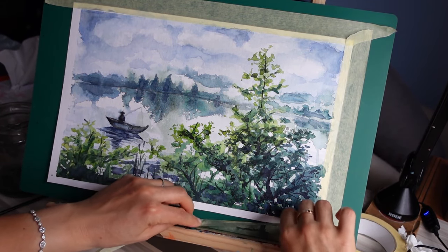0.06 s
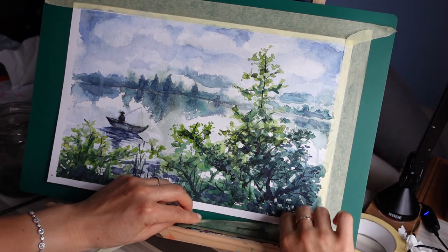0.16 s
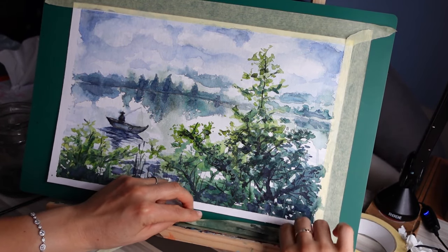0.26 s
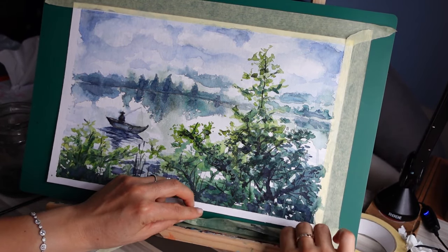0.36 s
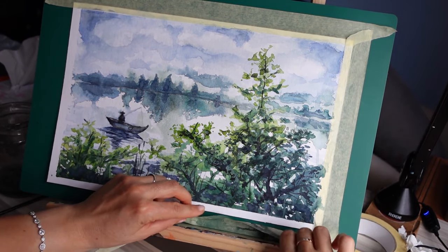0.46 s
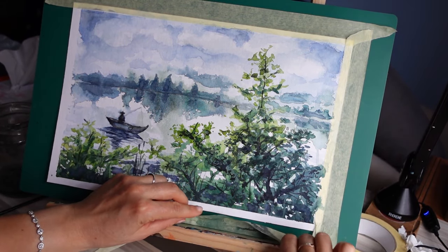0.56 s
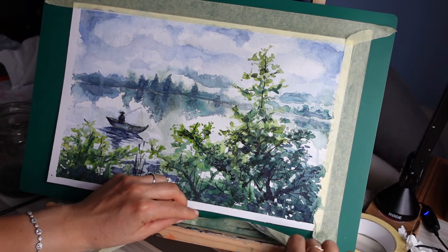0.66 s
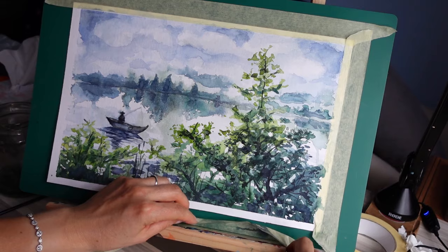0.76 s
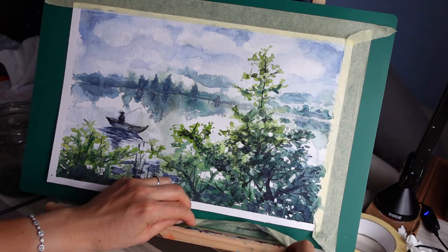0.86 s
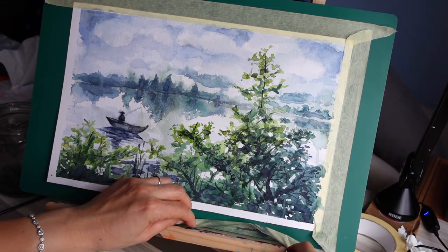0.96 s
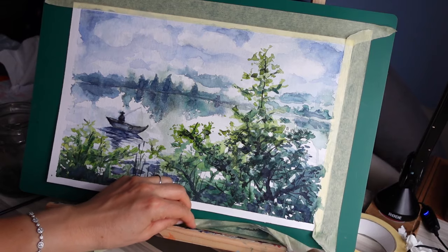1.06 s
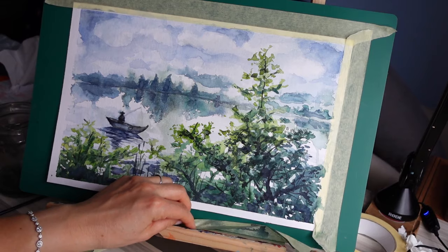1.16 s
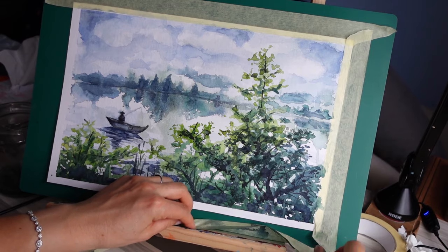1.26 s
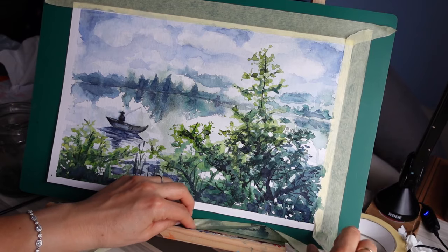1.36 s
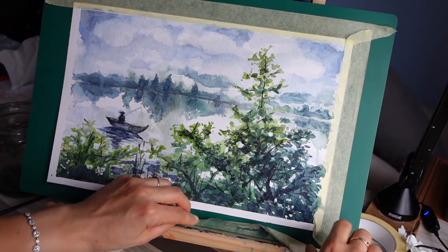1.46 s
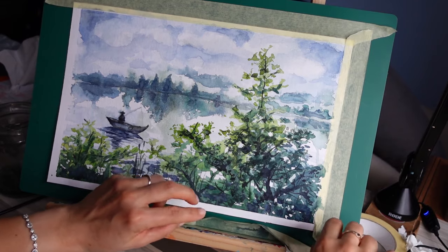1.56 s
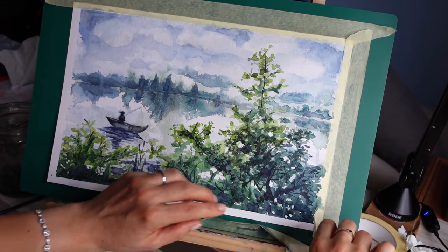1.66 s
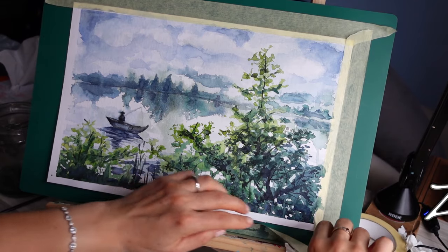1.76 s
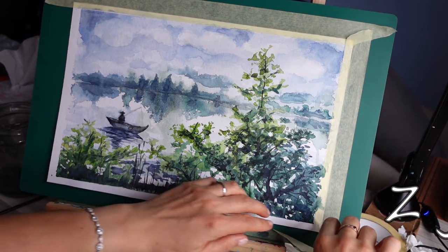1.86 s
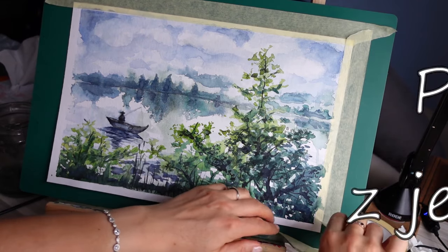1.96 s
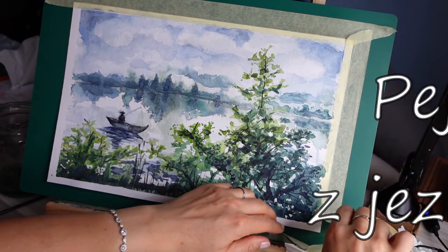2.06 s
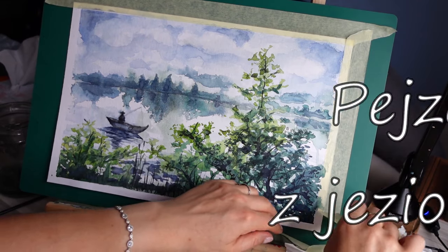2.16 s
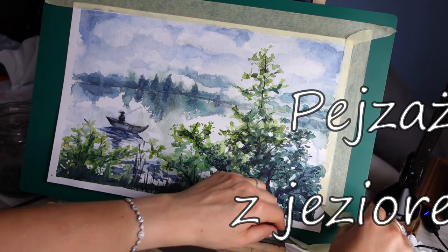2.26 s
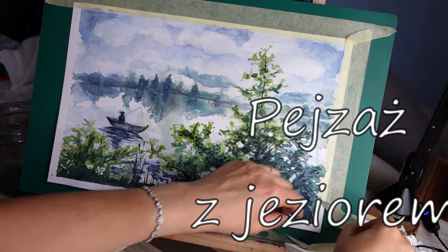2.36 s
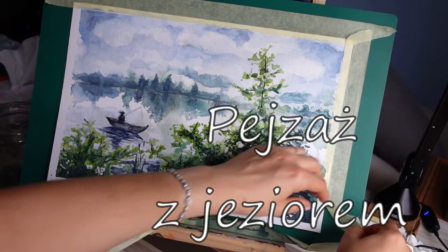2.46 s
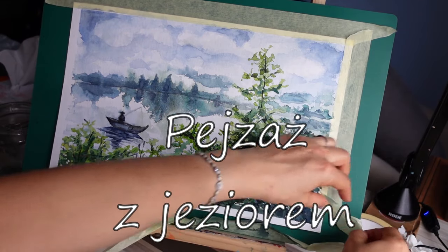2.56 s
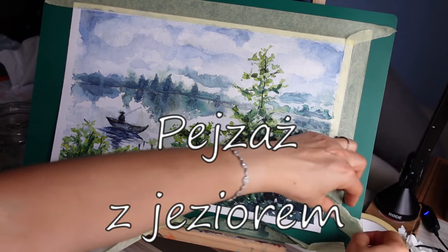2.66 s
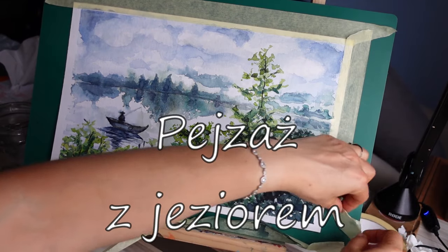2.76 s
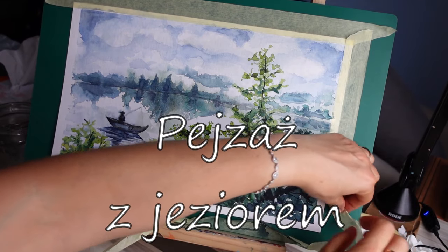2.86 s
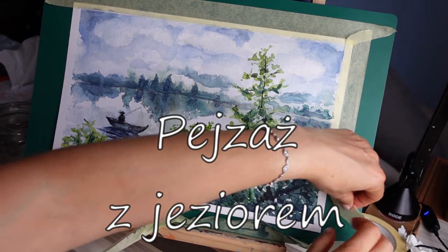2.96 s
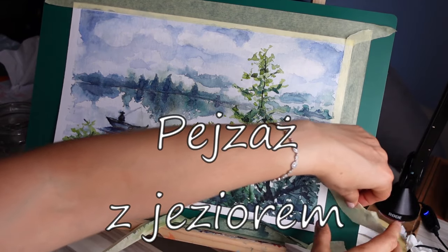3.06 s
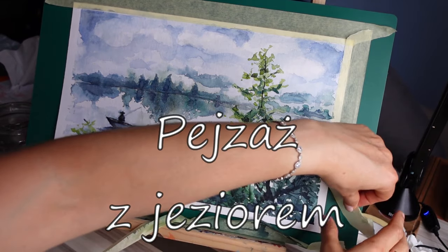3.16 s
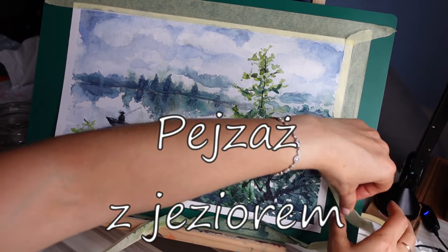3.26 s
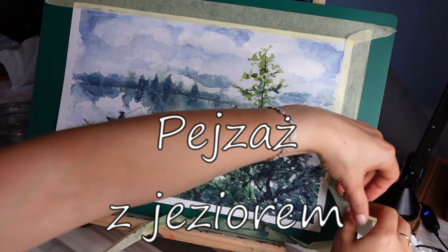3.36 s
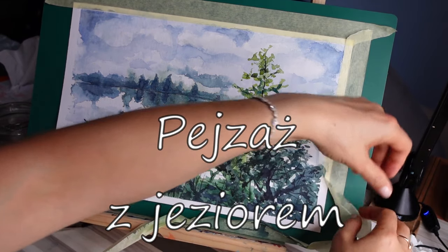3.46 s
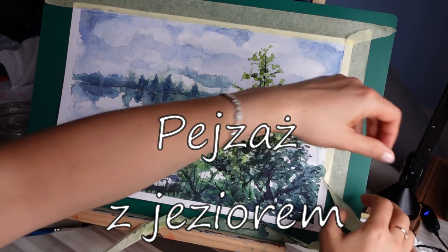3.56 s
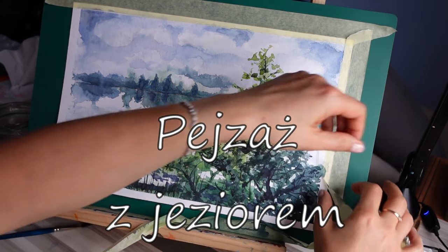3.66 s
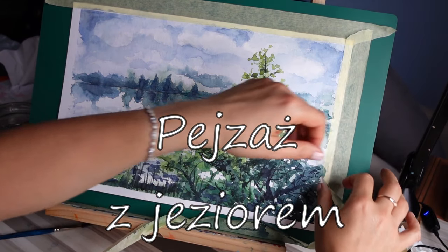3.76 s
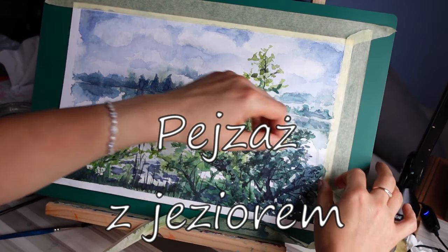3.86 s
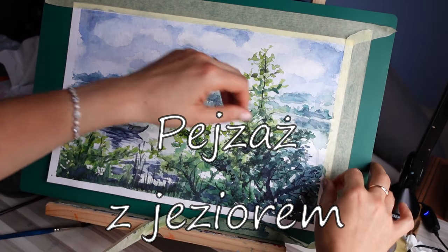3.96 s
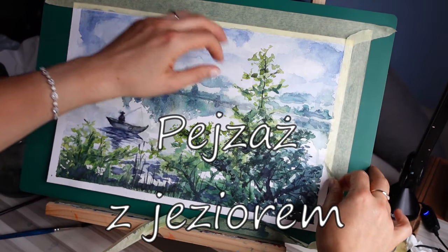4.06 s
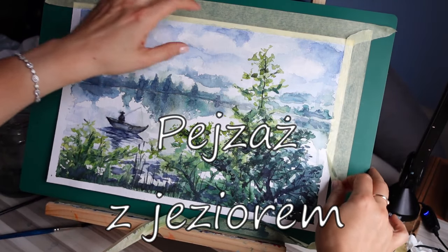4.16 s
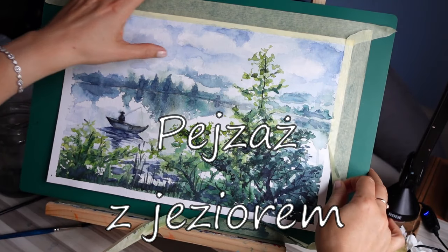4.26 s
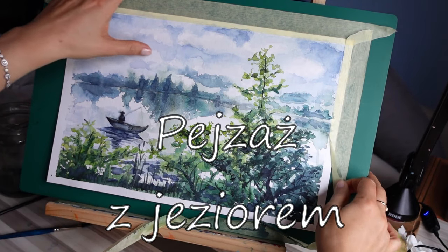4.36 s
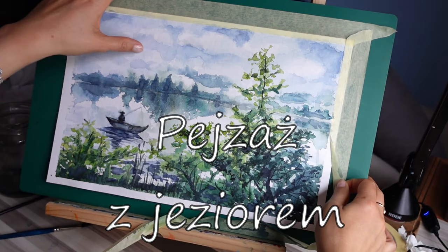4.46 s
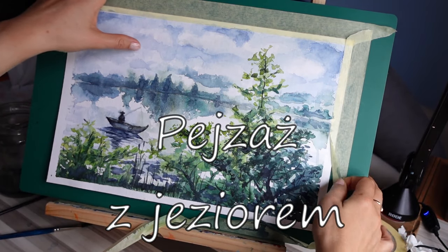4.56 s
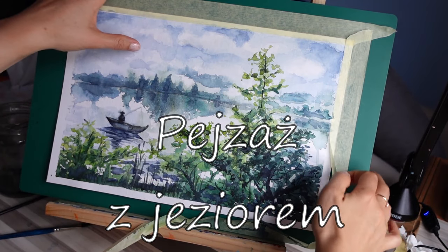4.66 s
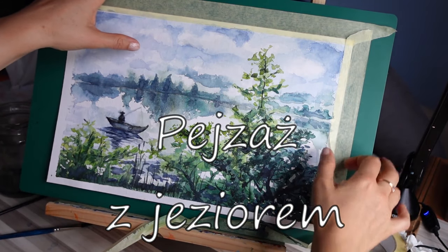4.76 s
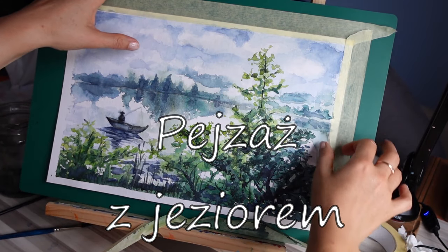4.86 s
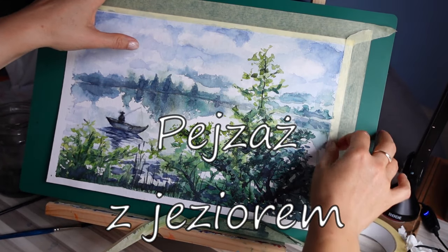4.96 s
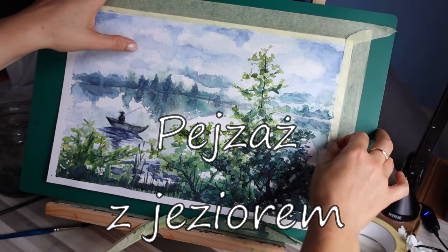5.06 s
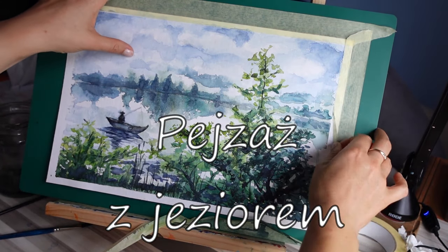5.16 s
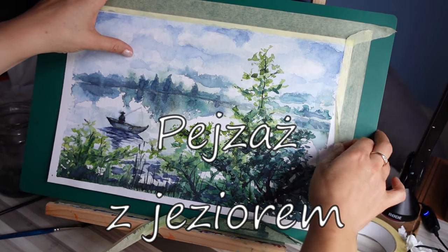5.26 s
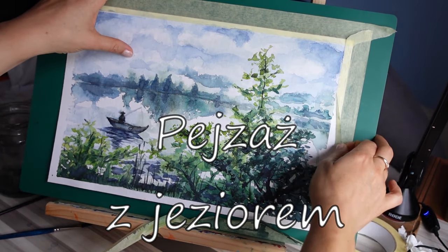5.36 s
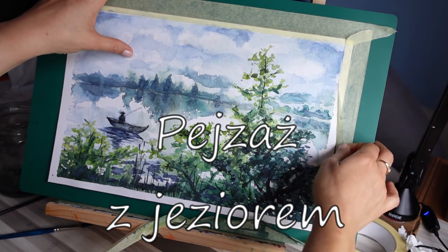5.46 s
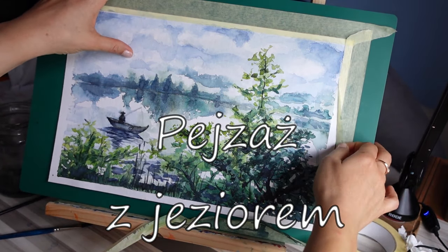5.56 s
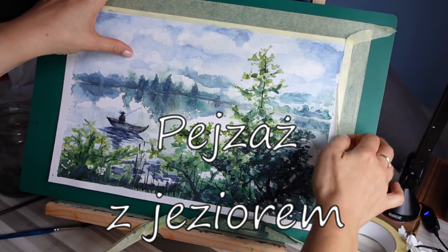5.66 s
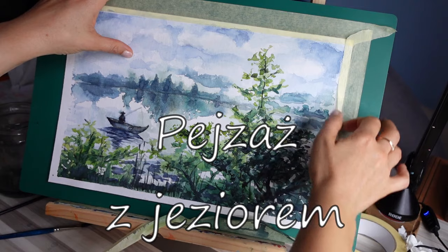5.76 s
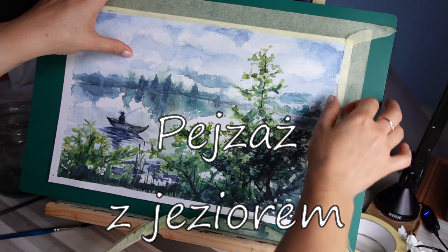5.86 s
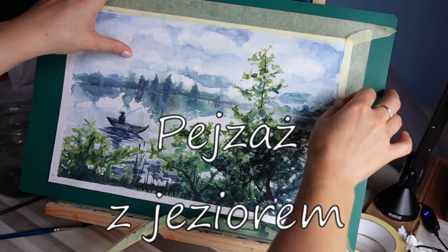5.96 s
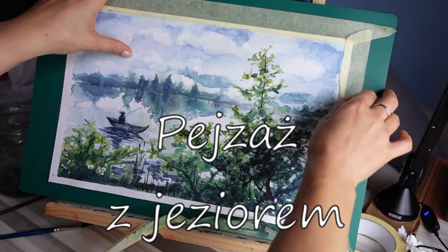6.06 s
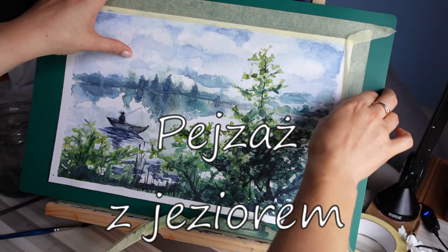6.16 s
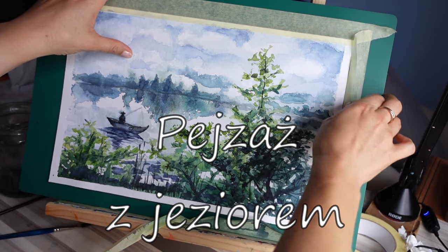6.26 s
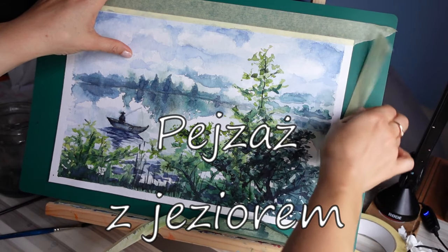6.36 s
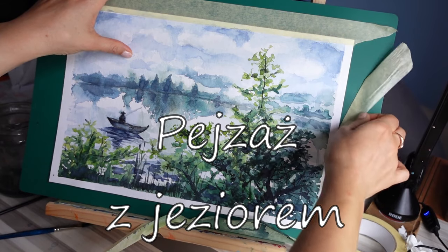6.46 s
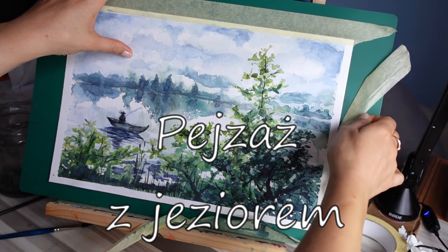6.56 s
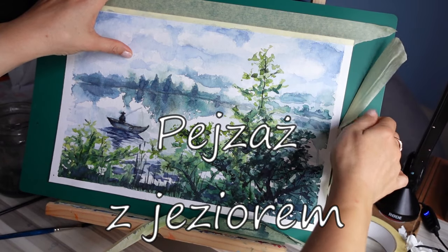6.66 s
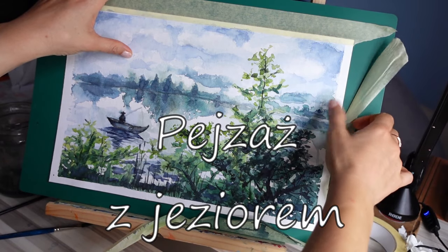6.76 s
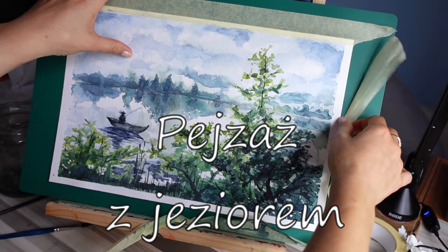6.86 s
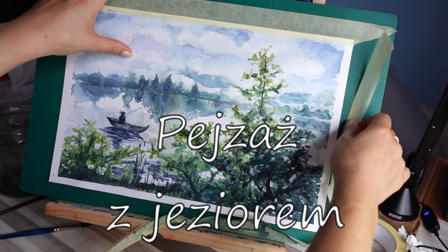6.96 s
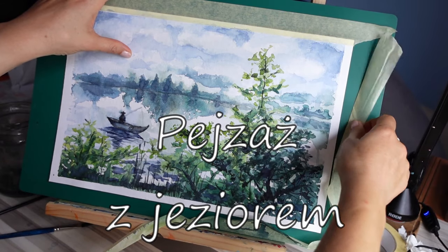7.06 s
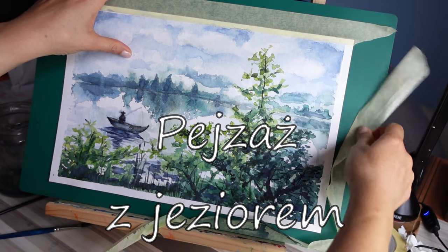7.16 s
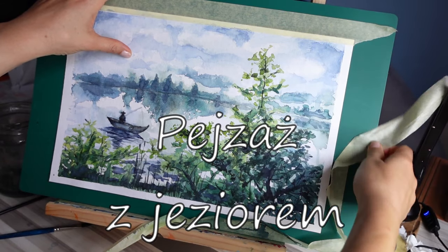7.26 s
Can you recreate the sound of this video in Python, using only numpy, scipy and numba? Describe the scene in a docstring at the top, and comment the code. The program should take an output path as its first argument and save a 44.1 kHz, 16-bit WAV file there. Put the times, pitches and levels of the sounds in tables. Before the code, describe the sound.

Masking tape is peeled off paper in short hissy rips and sharp crinkling snaps, over a faint hum in a small room.

```python
"""Masking tape is peeled off a sheet of paper on a board, in a small room.
The glue lets go in a swarm of tiny ticks, and the crinkly tape buckles in loud, ringing snaps.
The tight strip squeaks faintly, a hand bumps the board and a sleeve drags over the sheet.
The walls answer with a short, bright echo, and a hum wavers over the room's quiet hiss.
A stereo microphone hears it all from an arm's length away."""
import sys
import numpy as np
from scipy import signal
from scipy.fft import rfft, irfft
from scipy.io import wavfile
from scipy.ndimage import uniform_filter1d
from numba import njit

SR = 44100
rng = np.random.default_rng(int(sys.argv[2]) if len(sys.argv) > 2 else 0)


def int16_out(signal):
    """Quantize to a 16-bit WAV file."""
    q = np.round(np.clip(np.atleast_2d(signal).T, -1, 1) * 32767)
    wavfile.write(sys.argv[1], SR, q.astype(np.int16))


N = 322371

# Pulls on the tape. Each row: time of full strength in seconds, hold in seconds, level in dB,
# ring of the free strip in Hz.
TAPE_PULLS = [(0.033, 0.027, -54, 4700), (0.182, 0.08, -48, 4700), (0.28, 0.048, -31.5, 3640),
              (0.41, 0.02, -63, 2500), (0.47, 0.03, -39, 4000), (0.502, 0.054, -33, 1220),
              (0.634, 0.045, -43, 980), (0.7, 0.15, -51, 1530), (0.876, 0.19, -55, 3250),
              (1.07, 0.14, -54, 4140), (1.302, 0.21, -63.5, 4480), (1.486, 0.04, -48.5, 2450),
              (1.526, 0.04, -44, 4200), (1.622, 0.38, -63.5, 2440), (2.005, 0.078, -52.5, 3540),
              (2.108, 0.085, -55, 6100), (2.26, 0.42, -56.5, 5000), (2.804, 0.1, -63, 4360),
              (2.966, 0.1, -37, 3780), (3.115, 0.2, -50.5, 3440), (3.38, 0.11, -64, 2400),
              (3.488, 0.012, -53.5, 3790), (3.56, 0.085, -76, 2460), (4.052, 0.17, -52.5, 5100),
              (4.22, 0.13, -53.5, 2940), (4.358, 0.13, -56, 4640), (4.58, 0.036, -47.5, 2740),
              (5.152, 0.42, -53, 4350), (5.401, 0.05, -40, 2820), (5.505, 0.1, -58, 4050),
              (6.113, 0.06, -55.5, 3580), (6.198, 0.04, -41.5, 4340), (6.236, 0.0088, -31.5, 3770),
              (6.366, 0.03, -32, 2950), (6.384, 0.044, -27, 4810), (6.892, 0.05, -49.5, 4730),
              (6.942, 0.08, -41.5, 6000), (7.06, 0.021, -30, 2870), (7.138, 0.07, -40, 5000),
              (7.225, 0.052, -31.5, 4450)]
# Loud bucklings of the tape. Each row: time in seconds, level in dB, ring in Hz.
TAPE_SNAPS = [(0.2211, -23.5, 3900), (0.2491, -20.5, 5770), (0.2764, -22, 3530), (0.286, -15, 3700),
              (0.2965, -15.5, 3670), (0.3124, -17, 2180), (0.3482, -34, 4080), (0.4156, -17.5, 1520),
              (0.4963, -28, 6050), (0.5225, -11.5, 1300), (0.5619, -11, 1410), (0.5671, -14.5, 2860),
              (0.6396, -23, 2890), (0.6571, -20.5, 1010), (0.7583, -26, 1700), (0.7841, -14, 3000),
              (0.805, -24.5, 1000), (0.9251, -32.5, 2770), (1.0758, -11, 2880), (1.1637, -16, 3900),
              (1.2981, -20.5, 3300), (1.5031, -29, 2000), (1.537, -17, 3000), (1.6865, -37, 890),
              (1.7565, -36.5, 1780), (1.8878, -38.5, 5400), (1.9902, -31.5, 5900), (2.0417, -25, 6600),
              (2.378, -34, 4540), (2.817, -26, 4250), (2.8376, -29, 4130), (2.9602, -9.5, 3870),
              (2.966, -12.5, 4460), (3.0048, -17.5, 7300), (3.1639, -29.5, 6140), (3.3397, -16.5, 3340),
              (3.5227, -37, 3730), (4.0919, -32.5, 5170), (4.2786, -35, 4970), (4.3845, -30.5, 7400),
              (4.6181, -26, 2760), (4.6341, -13.5, 2820), (5.1467, -38, 4240), (5.3963, -20, 4180),
              (5.4, -13.5, 2830), (5.6481, -14.5, 3300), (6.115, -39.5, 3880), (6.1864, -26, 5700),
              (6.203, -20.5, 3800), (6.2383, -20.5, 5550), (6.2445, -18, 3000), (6.3465, -8.5, 2960),
              (6.3739, -12, 5460), (6.3899, -11.5, 5100), (6.401, -8.5, 5500), (6.4105, -16, 4820),
              (6.4216, -11, 4840), (6.4313, -22, 4700), (6.6139, -29.5, 4800), (6.6892, -41, 2200),
              (6.9447, -25, 8700), (6.969, -16, 5900), (6.9792, -11, 8300), (6.9894, -9.5, 3580),
              (7.0001, -11.5, 5700), (7.01, -11, 8400), (7.0615, -6, 5500), (7.1207, -14, 2700),
              (7.1322, -15.5, 2150), (7.149, -6.5, 5500), (7.1512, -7, 5700), (7.1694, -15, 5190),
              (7.1817, -8.5, 5800), (7.2251, -12.5, 3950), (7.23, -10.5, 4100), (7.2415, -7.5, 5600),
              (7.2587, -20, 3980), (7.2859, -12.5, 6030), (7.292, -16.5, 1110)]
# The broad, hissy part of a tick or snap. Each row: frequency in Hz, gain in dB.
CRACK_COLOUR = [(150, -32), (1200, -7.5), (2500, 1.5), (5500, 5.5), (9000, 4.5), (13000, 2.5),
                (16000, -6.5)]
# Notes the paper rings at. Each row: pitch in Hz, width in Hz, level in dB against the broad part.
PAPER_RINGS = [(2650, 270, -14), (5730, 780, -9.5), (7890, 270, -14.5)]
# Notes of the board, knocked by every snap. Each row: pitch in Hz, width in Hz, gain in dB.
BOARD_RINGS = [(477, 73, -66.5), (1018, 790, -19.5)]
# Squeaks of the tight strip. Each row: start in seconds, length in seconds, pitch in Hz, level in dB.
STRIP_SQUEAKS = [(1.216, 0.36, 2460, -60), (4.564, 0.046, 2640, -51)]
# Soft bumps of the hand on the board. Each row: start in seconds, level in dB, pitch in Hz.
HAND_BUMPS = [(2.75, -61, 402), (3.019, -51, 486), (3.354, -53.5, 356), (3.49, -66, 200)]
# Echoes off the board and table. Each row: delay in milliseconds, gain in dB, left minus right in dB.
EARLY_ECHOES = [(3.1, -23, -18), (7.6, -18.5, -16)]
# How long the room rings. Each row: frequency in Hz, seconds to fade by 60 dB.
ROOM_FADE = [(500, 0.44), (1400, 0.37), (3500, 0.33), (9000, 0.27), (14000, 0.34)]
# Soft furnishings swallow the highest treble. Each row: frequency in Hz, gain in dB.
WALL_COLOUR = [(9000, 4.5), (13000, -2.5)]
# The room's own hiss. Each row: frequency in Hz, relative strength in dB.
HISS_COLOUR = [(47, -42), (80, -34.5), (538, -6), (629, -5), (751, -12), (1820, -6), (2130, -9),
               (10300, -21.5), (16000, -24.5)]
# Narrow bands of noise that hum. Each row: pitch in Hz, width in Hz, level in dB.
HUM_BANDS = [(631.4, 29, -65), (1852, 16, -74.5)]

TICKS_PER_S, TICK_SCATTER_DB = 4000, 4
STRIP_SHARPNESS, STRIP_DB = 2.86, -3.5  # more sharpness gives a purer ring
RISE_DB_PER_S, FALL_DB_PER_S, REST_DB = 600, 294, -83
CREAK_DB, CREAK_S = -23, 0.0035  # a fold strains before it gives
SNAP_S, SNAP_POWER = 0.0016, 0.2  # fade time at 3 kHz; larger, lower folds last longer
SNAP_SHARPNESS, SHARPNESS_POWER = 1.86, 0.17  # at 4 kHz; larger folds ring less cleanly
TREBLE_DB, TREBLE_PER_DB = -3, 0.3144  # a harder snap is brighter
FOLD_HZ = 9220  # a fold is larger than a glue thread, so a snap is duller above this
CRACKLE_DB, CRACKLE_SCATTER_DB, CRACKLE_OCTAVES = 6.5, 11, 0.73  # above the pull's level and ring
RUB_START_S, RUB_LENGTH_S, RUB_DB, RUB_HZ, RUB_SHARPNESS = 2.74, 0.89, -58, 1500, 0.38
SQUEAK_SHARPNESS, BUMP_SHARPNESS, BUMP_RISE_S = 13., 2.5, 0.0088
ROOM_DB, ROOM_LIKENESS = -7, 0.81
HISS_DB, HISS_LIKENESS = -62.5, 0.38
LEAN_DB = -0.5  # left minus right
BASS_HZ, TOP_HZ = 150, 16300


def peeling_glue(pull_db, strip_hz):
    """Glue threads break in flurries of uneven ticks that ring the free strip and the paper."""
    chance, sign, size = rng.random(N), np.sign(rng.standard_normal(N)), rng.exponential(size=N)
    tick_db = TICK_SCATTER_DB * np.minimum(size, 3.5) + 3 * wander(45)
    ticks = (chance < TICKS_PER_S / SR) * sign * undb(tick_db)
    # the strip keeps a shape, then buckles into the next: its ring jumps from pull to pull
    strip_hz = uniform_filter1d(strip_hz, size=200)
    strip = band_pass(band_pass(ticks, strip_hz, STRIP_SHARPNESS), strip_hz, STRIP_SHARPNESS)
    sound = level(colour(ticks, CRACK_COLOUR), 0) + level(strip, STRIP_DB)
    for hz, width, db in PAPER_RINGS:
        sound += level(steady_band(ticks, hz, hz / width), db) * undb(0.8 * wander(4.8))
    return level(sound, 0) * undb(pull_db)


def tape_pulls():
    """Each pull swells, holds and lets go; the strongest sets the level and the strip's ring."""
    start, hold, db, hz = np.transpose(TAPE_PULLS)[:, :, None]
    t = np.arange(0, N + 64, 64) / SR
    before, after = np.maximum(start - t, 0), np.maximum(t - start - hold, 0)
    each_db = db - RISE_DB_PER_S * before - FALL_DB_PER_S * after
    sample_times = np.arange(N) / SR
    pull_db = np.interp(sample_times, t, np.maximum(each_db.max(0), REST_DB))
    strip_hz = np.interp(sample_times, t, hz[each_db.argmax(0), 0])
    return pull_db, strip_hz


def buckling_snaps(rows, size=2048, lead=1024):
    """A fold creaks, then gives in a burst that rings it, spits treble and knocks the board."""
    start, db, hz = np.transpose(rows)[:, :, None]
    t = (np.arange(size) - lead) / SR
    creak = undb(CREAK_DB) * np.exp(t / CREAK_S)
    fade = np.exp(-np.abs(t) / SNAP_S * (hz / 3000) ** SNAP_POWER)
    burst = rfft(rng.standard_normal((len(start), size)) * np.where(t < 0, creak, fade))
    f = np.fft.rfftfreq(size, 1 / SR)
    ring = resonance(f, hz, SNAP_SHARPNESS * (hz / 4000) ** SHARPNESS_POWER)
    treble = undb(TREBLE_DB + TREBLE_PER_DB * db + look_up(f, CRACK_COLOUR)) / (1 + (f / FOLD_HZ) ** 2)
    board = sum(undb(gain) * resonance(f, pitch, pitch / width) for pitch, width, gain in BOARD_RINGS)
    # two versions: one heads for the microphone, an even blend of all directions fills the room
    direct = irfft(burst * (ring ** 2 + treble + board), size)
    smooth_power = uniform_filter1d(np.abs(burst) ** 2, size=300, axis=1)
    blend = np.sqrt(smooth_power) * np.exp(1j * np.angle(burst))
    spread = irfft(blend * (0.76 * np.abs(ring) ** 3.1 + treble + board), size)
    loudest = np.sqrt(2 * uniform_filter1d(direct ** 2, size=30, axis=1).max(axis=1, keepdims=True))
    out = np.zeros((2, N + size))
    for track, part in zip(out, (direct, spread)):
        np.add.at(track, (start * SR).astype(int) + np.arange(size), part * undb(db) / loudest)
    return out[:, lead:N + lead]


def small_folds(pull_db, strip_hz, count=280):
    """Rows for extra snaps: small folds give at random times, louder when the pull is stronger."""
    when, size, tune = rng.random((count, 3)).T
    at = (when * N).astype(int)
    db = pull_db[at] + CRACKLE_DB + CRACKLE_SCATTER_DB * size ** 2
    hz = strip_hz[at] * 2 ** (CRACKLE_OCTAVES * tune)
    return np.transpose([at / SR, db, hz])


def strip_squeaks():
    """The tight strip squeaks: noise squeezed into a thin note."""
    return sum(ringing_noise(hz, SQUEAK_SHARPNESS, db) * gate(start, length)
               for start, length, hz, db in STRIP_SQUEAKS)


def hand_bumps():
    """A hand bumps the board: low noise that swells quickly and dies away."""
    out = np.zeros(N)
    for start, db, hz in HAND_BUMPS:
        age = np.maximum(np.arange(N) / SR - start, 0) / BUMP_RISE_S
        out += ringing_noise(hz, BUMP_SHARPNESS, db) * age * np.exp(1 - age)
    return out


def sleeve_rub():
    """A sleeve drags over the sheet with a broad, slightly uneven hiss."""
    hiss = ringing_noise(RUB_HZ, RUB_SHARPNESS, RUB_DB)
    return hiss * gate(RUB_START_S, RUB_LENGTH_S, fade=0.017) * undb(0.99 * wander(6.7))


def room_echo(sound, size=26460):
    """Nearby surfaces send back early echoes; the walls add a tail whose low notes last longest."""
    t = np.arange(size) / SR
    f, times, cells = signal.stft(pair(size, ROOM_LIKENESS), SR, nperseg=256)
    fade_db = -60 * times / look_up(f, ROOM_FADE)[:, None]
    cells *= undb(fade_db + look_up(f, WALL_COLOUR)[:, None])
    tail = signal.istft(cells, SR)[1][:, :size] * (1 - np.exp(-t / 0.0013))
    tail *= undb(ROOM_DB) / np.sqrt(np.mean(np.sum(tail ** 2, axis=1)))
    for ms, db, pan_db in EARLY_ECHOES:
        tail[:, int(ms * SR / 1000)] += undb(db + np.array([pan_db, -pan_db]) / 2)
    return signal.fftconvolve(sound[None], tail, axes=1)[:, :N]


def hiss_and_hum():
    """The background: a steady soft hiss and a narrow hum that wavers."""
    out = level(colour(pair(N, HISS_LIKENESS), HISS_COLOUR), HISS_DB)
    for hz, width, db in HUM_BANDS:
        band = np.array([steady_band(side, hz, hz / width) for side in pair(N, likeness=0.72)])
        out += level(band, db) * undb(0.5 * wander(6.1))
    return out


def undb(db):
    """Turn decibels into a number to multiply by."""
    return 10 ** (np.asarray(db) / 20)


def level(x, db):
    """Scale a sound to an average level in dB."""
    return x * undb(db) / np.sqrt(np.mean(x ** 2))


def look_up(hz, table):
    """Read between the rows of a frequency table, with octaves evenly spaced."""
    at, value = np.transpose(table)
    return np.interp(np.log(hz + 1), np.log(at), value)


def colour(x, table):
    """Turn each frequency up or down by the table's dB."""
    size = x.shape[-1]
    return irfft(rfft(x) * undb(look_up(np.fft.rfftfreq(size, 1 / SR), table)), size)


def pair(size, likeness):
    """Left and right noise: likeness 0 is unrelated, 1 is identical."""
    mid, side = rng.standard_normal((2, size))
    return np.sqrt((1 + likeness) / 2) * mid + np.sqrt((1 - likeness) / 2) * side * np.array([[1], [-1]])


def resonance(f, hz, sharpness):
    """How something that rings at hz answers each frequency f; the gain is 1 at hz."""
    drive = 1j * f / hz / sharpness
    return drive / (1 - (f / hz) ** 2 + drive)


@njit
def band_pass(x, hz, sharpness):
    """Keep the sound near a pitch that can move from sample to sample."""
    out, band, low, damping = np.empty(len(x)), 0., 0., 1 / sharpness
    for i in range(len(x)):
        step = np.tan(np.pi * hz[i] / SR)
        swing = (band + step * (x[i] - low)) / (1 + step * (step + damping))
        band, low = 2 * swing - band, low + 2 * step * swing
        out[i] = damping * swing
    return out


def steady_band(x, hz, sharpness):
    """Keep the sound near one steady pitch."""
    return band_pass(x, np.full(N, float(hz)), sharpness)


def ringing_noise(hz, sharpness, db):
    """Noise filtered twice around one pitch."""
    once = steady_band(rng.standard_normal(N), hz, sharpness)
    return level(steady_band(once, hz, sharpness), db)


def wander(rate):
    """Glide to a new random value, rate times a second."""
    step = int(SR / rate)
    return uniform_filter1d(np.repeat(rng.standard_normal(N // step + 1), step), step)[:N]


def gate(start, length, fade=0.02):
    """Fade in at start and be silent again length seconds later."""
    t = np.arange(N) / SR - start
    return np.clip(np.minimum(t, length - t) / fade, 0, 1)


def scene():
    """Mix the tape and the handling sounds with their echo, over the background."""
    pull_db, strip_hz = tape_pulls()
    folds = np.vstack([TAPE_SNAPS, small_folds(pull_db, strip_hz)])
    tape = buckling_snaps(folds) + peeling_glue(pull_db, strip_hz)
    direct, spread = tape + sleeve_rub() + strip_squeaks() + hand_bumps()
    balance = undb(np.array([[LEAN_DB], [-LEAN_DB]]) / 2)
    return (direct + room_echo(spread)) * balance + hiss_and_hum()


def record(dry):
    """The microphone misses the bass, peaks that are too loud are clipped and the top treble is cut."""
    thin = signal.sosfilt(signal.butter(2, BASS_HZ, "high", fs=SR, output="sos"), dry)
    clipped = np.clip(thin, -.9, .9)
    return signal.sosfilt(signal.ellip(10, .2, 70, TOP_HZ, fs=SR, output="sos"), clipped)


dry = scene()
out = record(dry)
int16_out(out)
```